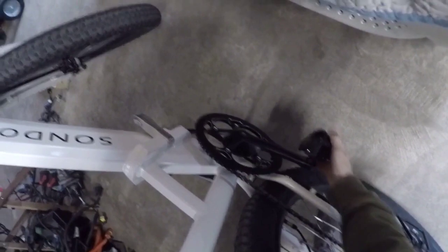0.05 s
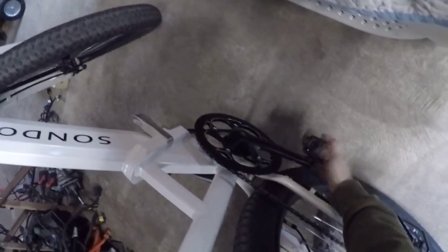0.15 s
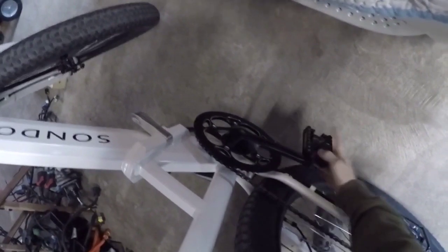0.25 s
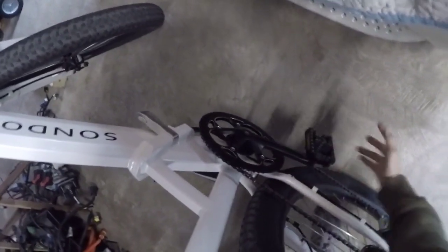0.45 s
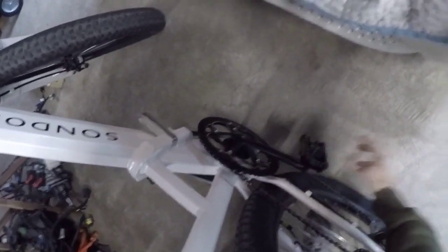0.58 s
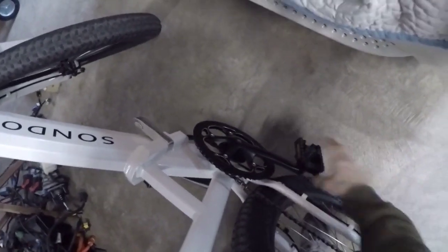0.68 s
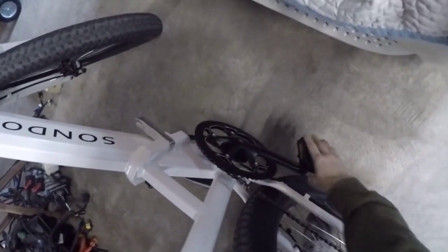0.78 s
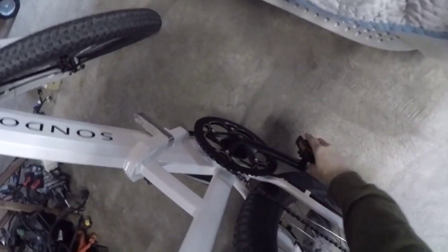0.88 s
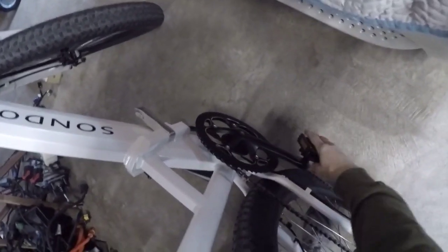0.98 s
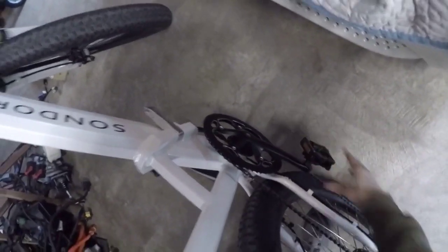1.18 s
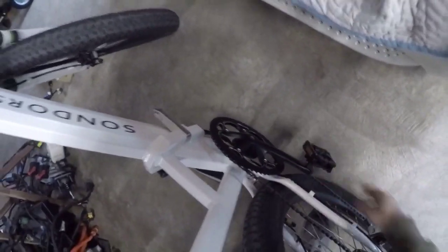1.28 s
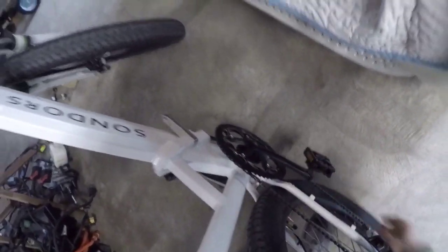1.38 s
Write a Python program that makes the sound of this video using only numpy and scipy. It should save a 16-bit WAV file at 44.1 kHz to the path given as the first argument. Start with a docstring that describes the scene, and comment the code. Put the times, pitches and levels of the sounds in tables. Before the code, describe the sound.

A bike pedal flips with a hard rattling snap and later a lighter click, over low rumble

```python
"""Folding bicycle pedal in a garage

A latch ticks, the pedal snaps up against its stop in a quick chatter, settles, and later clicks back down.
Each contact is a filtered noise crack plus decaying sine modes; the frame adds a faint modal ring.
The garage answers with noise whose bands decay at their own rates.
Spectrally shaped noise gives a low rumble and soft air throughout."""
import sys
import numpy as np
from scipy import signal
from scipy.fft import rfft, irfft
from scipy.io import wavfile
from scipy.ndimage import uniform_filter1d

SR = 44100
rng = np.random.default_rng(int(sys.argv[2]) if len(sys.argv) > 2 else 0)


def transcribe(signal):
    """Save signal, clipped to [-1, 1], as a 16-bit WAV file at the path in sys.argv[1]."""
    frames = np.atleast_2d(signal).T
    limited = np.clip(frames, -1, 1)
    pcm = np.round(limited * 32767).astype(np.int16)
    wavfile.write(sys.argv[1], SR, pcm)


N = 63945  # length in samples

# Background noise spectrum, relative: hz, density_db (per Hz)
AIR_SPECTRUM = [(8.8, -33), (15, -3.5), (47, -2.5), (70, -10), (122, -17), (173, -29.5), (239, -22),
                (268, -31.5), (380, -26.5), (453, -31.5), (624, -26), (1090, -27.5), (2840, -46),
                (14500, -62.5), (15800, -63)]
AIR_DB = -40.5  # RMS level
PATCH_DB = 0.97  # standard deviation of the drifting patches

# Frame modes excited by the two snaps: hz, t60_s, up_db, down_db
FRAME_MODES = [(122.6, 0.56, -40.5, -68), (397, 0.64, -41, -50), (664, 0.37, -44, -54),
               (4770, .55, -55, -70), (5660, 0.28, -58, -47)]

# Reverberation time of the garage: hz, t60_s
GARAGE_DECAY = [(150, 0.55), (500, 0.55), (1500, .5), (3000, 0.44), (4600, 0.49), (6000, 0.44), (9000, .33),
                (14000, 0.33)]
# Relative colour of the garage's answer to the snap up: hz, density_db (per Hz)
ECHO_UP_COLOUR = [(90, -30), (150, -6), (300, -15), (395, -1.5), (510, -10), (670, -2), (880, -6.5),
                  (980, -15), (1300, -9), (1900, -14), (3300, -13.5), (4050, -11), (4750, -11),
                  (5400, -20.5), (8500, -23), (12500, -32.5), (15000, -43)]
# Relative colour of its answer to the tick and the snap down: hz, density_db (per Hz)
ECHO_DOWN_COLOUR = [(180, -25), (390, -5), (520, -6.5), (870, -1), (1050, -9), (1550, -9.5), (2000, -13.5),
                    (3250, -8), (3900, -12), (4800, -19), (5650, -8.5), (6100, -15.5), (7100, -11),
                    (8500, -19.5), (12800, -37), (15500, -43)]
ECHO_TICK_DB, ECHO_UP_DB, ECHO_DOWN_DB = -50, -25.5, -38.5  # levels before the decay
BUILD_S = 0.0029  # linear build-up of the reflections

# Contacts of the latch tick: start_s, edge_db, weight_db (both relative)
TICK_CONTACTS = [(.1850, -28.5, -27), (.1893, -59, -41)]
# Contacts of the snap up: start_s, edge_db, weight_db (both relative)
UP_CONTACTS = [(0.2133, -15.5, -31), (0.218, -33, -29), (.2206, -6.5, -23), (0.2223, -4.5, -8.5),
               (0.2239, -12.5, -23.5), (0.2257, -11, -8.5), (0.2302, -45, -17), (0.2328, -20, -16.5)]
# Contacts of the snap down: start_s, edge_db, weight_db (both relative)
DOWN_CONTACTS = [(.9180, -11.5, -22), (.9194, -30, -25.5), (.9204, -37, -16), (.9213, -30, -22.5),
                 (0.9246, -36, -25)]
# Contacts as the pedal settles: start_s, edge_db, weight_db (both relative)
SETTLE_CONTACTS = [(.3070, -42, -26.5), (.3230, -50, -29), (.3370, -50, -30), (.3520, -52, -34),
                   (.3670, -52, -36), (0.382, -39, -33.5)]
# Pedal modes, with relative levels per move: hz, t60_s, tick_db, up_db, down_db, settle_db
PEDAL_MODES = [(255, 0.058, -20, -11, -17.5, -13), (407.7, 0.084, -19.5, -5, -5, -13),
               (605, 0.051, -28, -15, -11, -14), (702.5, 0.036, -14, -1, -13, -8),
               (892, .05, -8, 0, -1, -10), (1053, 0.034, 3.5, -12, 1.5, -5.5),
               (1298, .04, -16, -12, -7.5, -0.5), (1570, .03, -21, -6, -24, -6),
               (2218, .03, -18, -9, -17, 1), (2800, 0.031, 7, -10.5, -15, -6),
               (3240, 0.039, -24, -9.5, -2.5, -10), (3940, 0.021, -9, -6, -2.5, -14),
               (4030, 0.024, -15, -3.5, -9.5, -14), (4670, 0.024, -20, -1.5, -13, -24),
               (5160, .015, -16, -10, -26, -20), (6580, 0.015, -10, -11.5, -13, -24),
               (7400, 0.017, -22, -12.5, -8, -24), (7850, 0.011, -14.5, -11, -13, -26),
               (9450, .01, -24, -13.5, -26, -30)]
SPLIT_HZ = 2000  # modes above follow the edge, the others the weight
# Filter gain of the contact crack, relative: hz, gain_db
CRACK_SPECTRUM = [(500, -36), (2000, -28), (5000, -5), (7600, -2), (8400, -9), (12000, -16), (16000, -31)]
CRACK_DB, CRACK_T60_S = -4, 0.014  # gain relative to the edge, decay time
RISE_S = 0.00038  # time constant of the onset
TICK_SEATS_S, UP_SEATS_S, DOWN_SEATS_S = 0.1912, 0.2273, 0.9233  # when the pedal seats after each move
CHOKE_DB, CHOKE_S = -10, 0.00099  # gain reached on seating, time taken to reach it

EDGE_HZ = 15700  # upper band limit


def amp(db):
    """Level law: 20 dB is a factor of ten in amplitude."""
    return 10 ** (np.asarray(db) / 20)


def read(points, hz):
    """Linear interpolation along a logarithmic frequency axis."""
    point_hz, value = np.transpose(points)
    return np.interp(np.log(hz + 1), np.log(point_hz + 1), value)


def coloured(x, points):
    """Linear filtering: multiply the spectrum of x by a gain curve in dB."""
    gain = amp(read(points, np.fft.rfftfreq(len(x), 1 / SR)))
    return irfft(rfft(x) * gain, len(x))


def add(mix, start_s, sound):
    """Superposition: sum a sound into the mix from its start, cut at the end of the mix."""
    part = mix[round(start_s * SR):][:len(sound)]
    part += sound[:len(part)]


def ring(hz, t60_s, level_db, t):
    """Damped free vibration: a sine under an exponential decay of 60 dB per t60_s."""
    return amp(level_db - 60 * t / t60_s) * np.sin(2 * np.pi * hz * t)


def air():
    """Stationary random noise: low rumble and soft broad air, with levels drifting in time and frequency."""
    frames, hz = N // 1024 + 6, np.fft.rfftfreq(4096, 1 / SR)
    real, imag, patches = rng.standard_normal((frames, 2049, 3)).T
    patches = uniform_filter1d(patches, size=40, axis=0)  # across frequency
    patches = uniform_filter1d(patches, size=4, axis=1)  # across time
    level_db = read(AIR_SPECTRUM, hz)[:, None] + PATCH_DB * patches / patches.std()
    spectrum = (real + 1j * imag) * amp(level_db)
    noise = signal.istft(spectrum, nperseg=4096, noverlap=3072)[1][:N]
    return amp(AIR_DB) * noise / noise.std()


def garage(start_s, colour, level_db):
    """Diffuse reverberation: dense reflections build up, then each band dies at its own rate."""
    wash = coloured(rng.standard_normal(SR), colour)
    hz, t, bands = signal.stft(wash / wash.std(), SR, nperseg=256)
    decay = amp(level_db - 60 * t / read(GARAGE_DECAY, hz)[:, None])
    tail = signal.istft(bands * decay, SR, nperseg=256)[1]
    build_up = np.minimum(np.arange(len(tail)) / SR / BUILD_S, 1)
    out = np.zeros(N)
    add(out, start_s, tail * build_up)
    return out


def frame():
    """Modal resonance: the crank and frame sing on faintly after each snap."""
    out, t = np.zeros(N), np.arange(SR // 2) / SR
    up = sum(ring(hz, t60_s, up_db, t) for hz, t60_s, up_db, _ in FRAME_MODES)
    down = sum(ring(hz, t60_s, down_db, t) for hz, t60_s, _, down_db in FRAME_MODES)
    add(out, UP_CONTACTS[2][0], up)  # from the third contact of the chatter
    add(out, DOWN_CONTACTS[0][0], down)
    return out


def contacts(rows, level_column, seats_s=0):
    """Impact excitation: each contact cracks; its edge drives the high modes, its weight the low ones."""
    out, t = np.zeros(N), np.arange(6000) / SR
    for start_s, edge_db, weight_db in rows:
        crack_decay = amp(edge_db + CRACK_DB - 60 * t / CRACK_T60_S)
        crack = coloured(rng.standard_normal(len(t)), CRACK_SPECTRUM) * crack_decay
        modes = np.zeros(len(t))
        for mode in PEDAL_MODES:
            hz, t60_s = mode[:2]
            drive_db = edge_db if hz > SPLIT_HZ else weight_db
            modes += ring(hz, t60_s, mode[level_column] + drive_db, t)
        onset = 1 - np.exp(-t / RISE_S)
        # seating damps only contacts that began before it
        seated = np.clip((start_s + t - seats_s) / CHOKE_S, 0, 1) * (start_s < seats_s)
        add(out, start_s, (crack + modes / 2) * onset * amp(CHOKE_DB * seated))
    return out


def scene():
    """Superposition of the background, the garage's answers, the frame and the pedal."""
    echoes = (garage(TICK_CONTACTS[0][0], ECHO_DOWN_COLOUR, ECHO_TICK_DB)
              + garage(UP_CONTACTS[2][0], ECHO_UP_COLOUR, ECHO_UP_DB)
              + garage(DOWN_CONTACTS[0][0], ECHO_DOWN_COLOUR, ECHO_DOWN_DB))
    pedal = (contacts(TICK_CONTACTS, level_column=2, seats_s=TICK_SEATS_S)
             + contacts(UP_CONTACTS, level_column=3, seats_s=UP_SEATS_S)
             + contacts(DOWN_CONTACTS, level_column=4, seats_s=DOWN_SEATS_S)
             + contacts(SETTLE_CONTACTS, level_column=5))
    return (air() + echoes + frame() + pedal)[None]


def record(dry):
    """Band limiting: a linear-phase low-pass filter removes the highest treble."""
    low_pass = signal.firwin(511, EDGE_HZ, window=("kaiser", 9), fs=SR)
    return signal.oaconvolve(dry, low_pass[None], "same")


dry = scene()
out = record(dry)
transcribe(out)
```